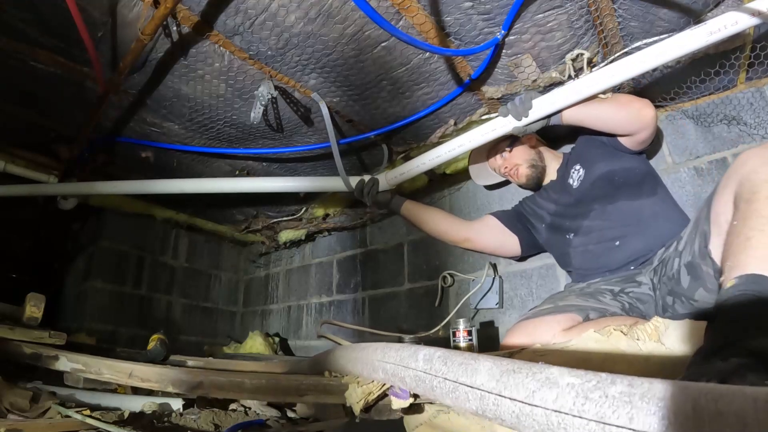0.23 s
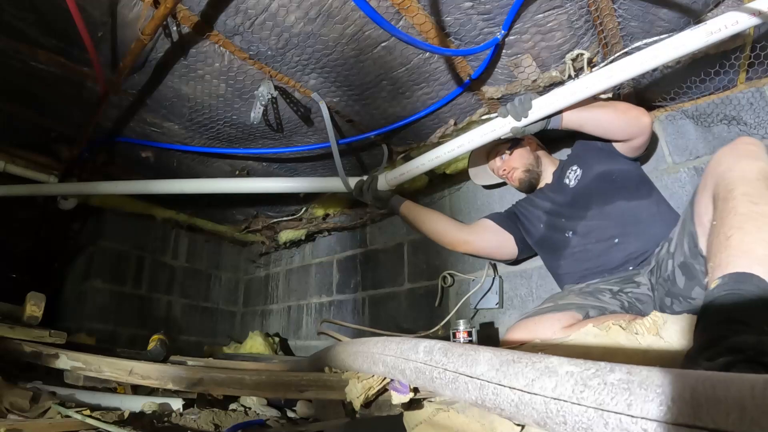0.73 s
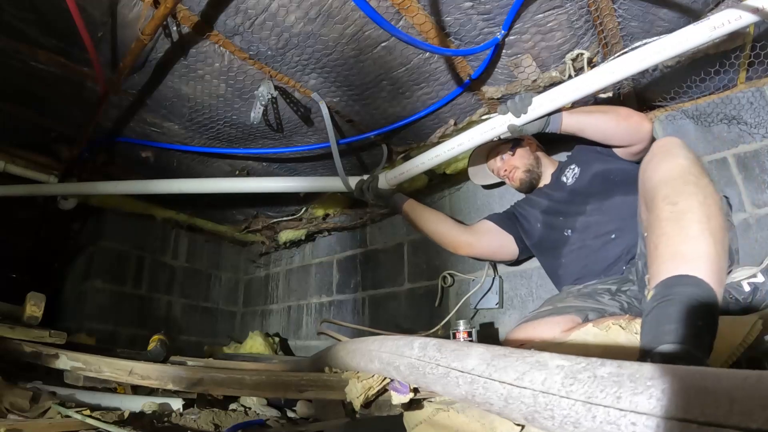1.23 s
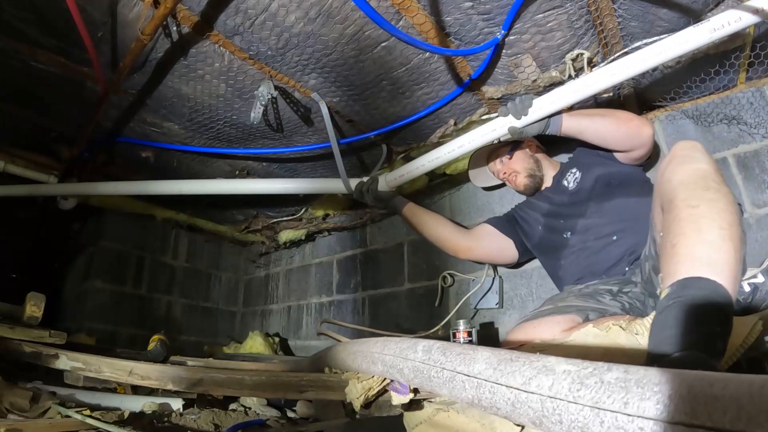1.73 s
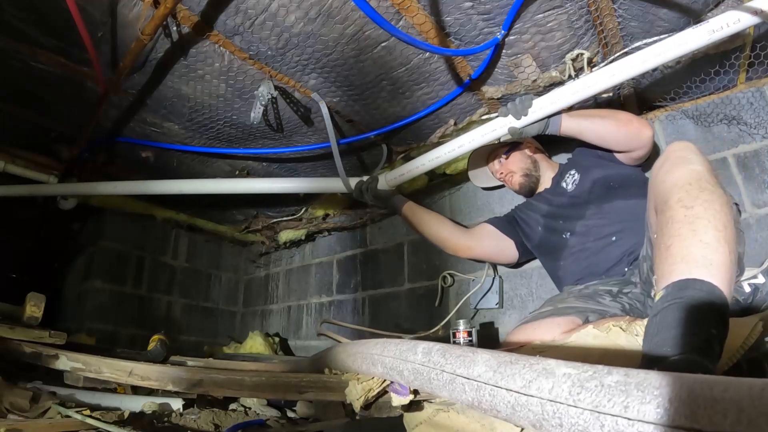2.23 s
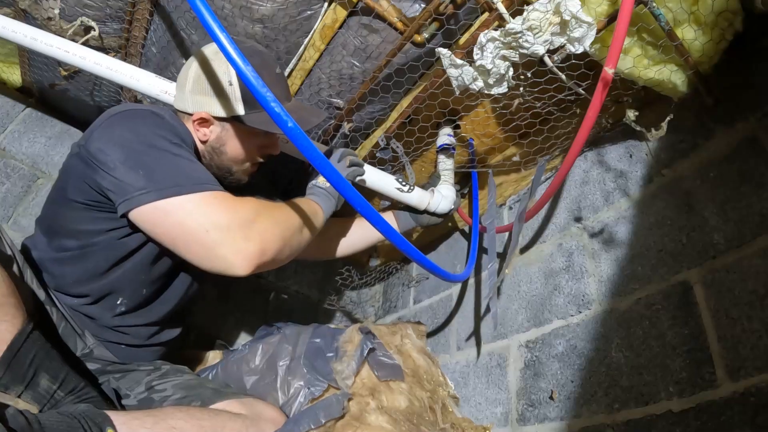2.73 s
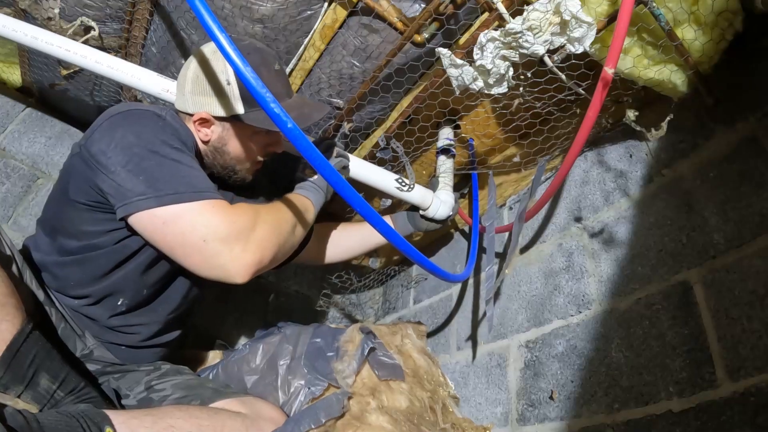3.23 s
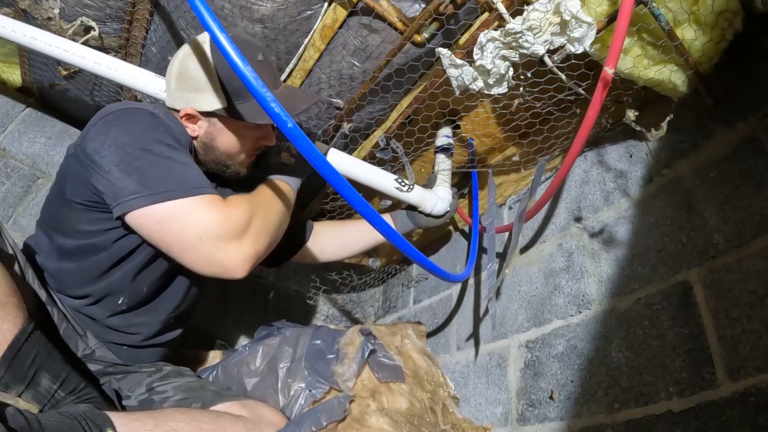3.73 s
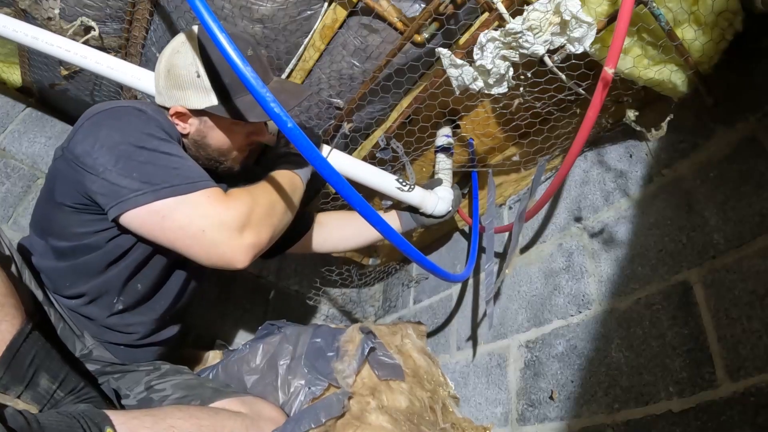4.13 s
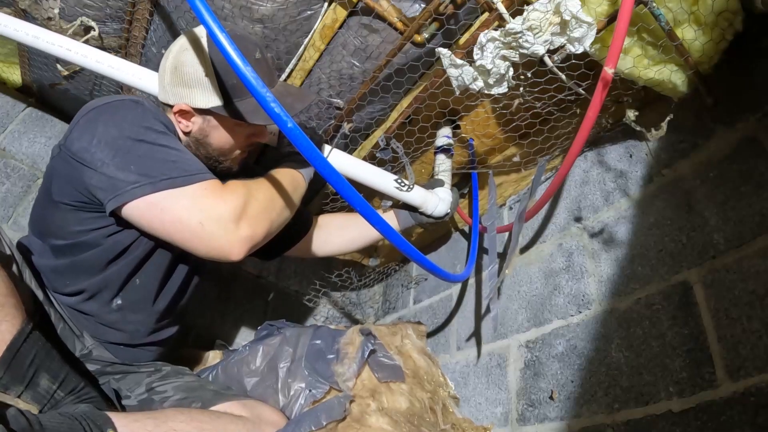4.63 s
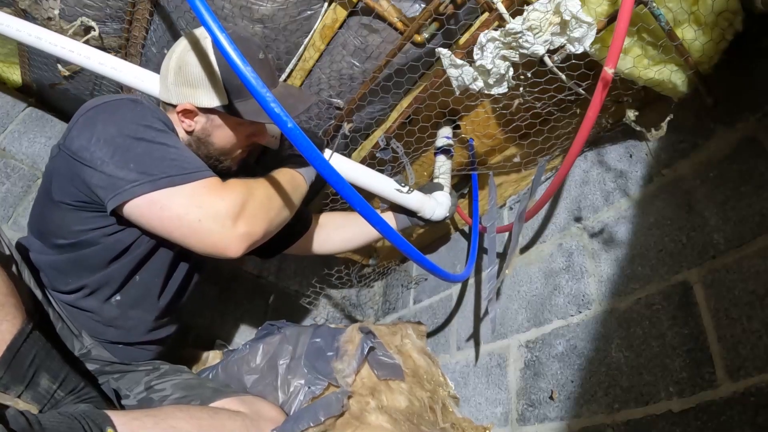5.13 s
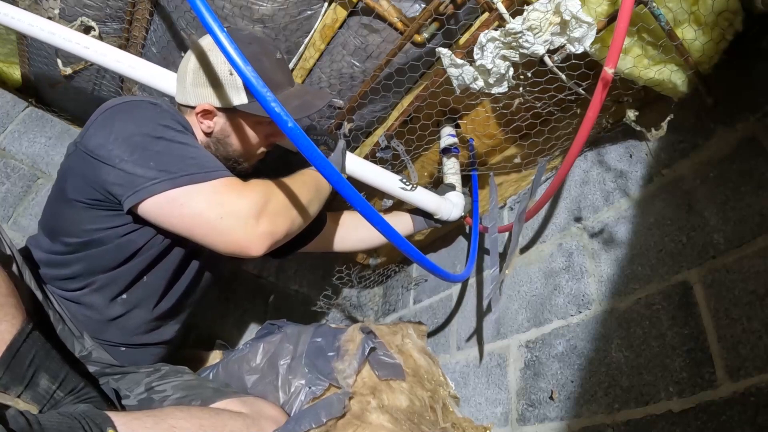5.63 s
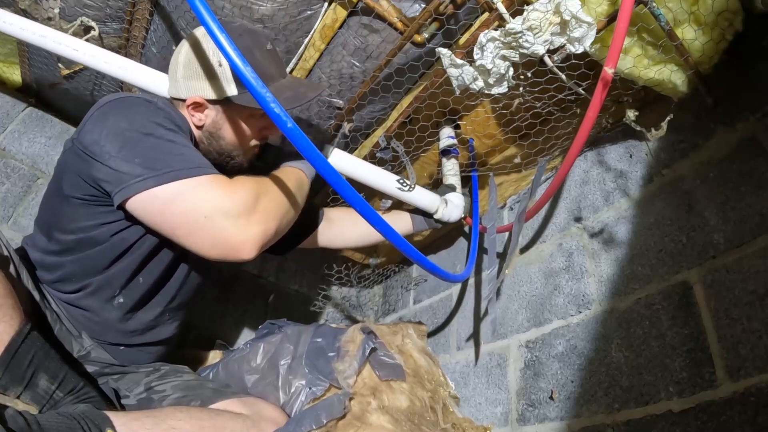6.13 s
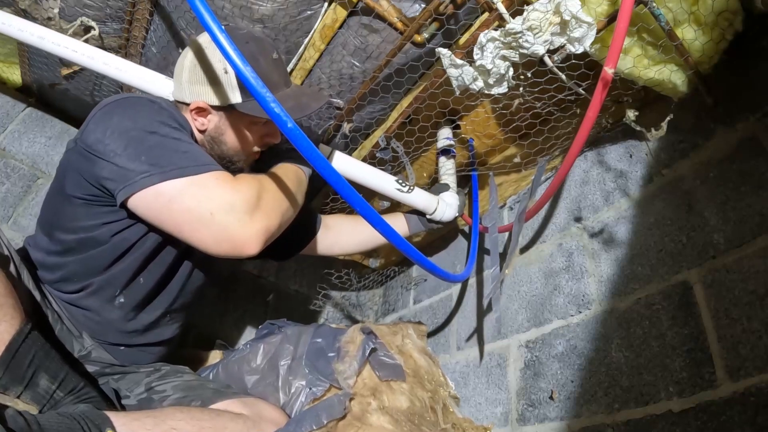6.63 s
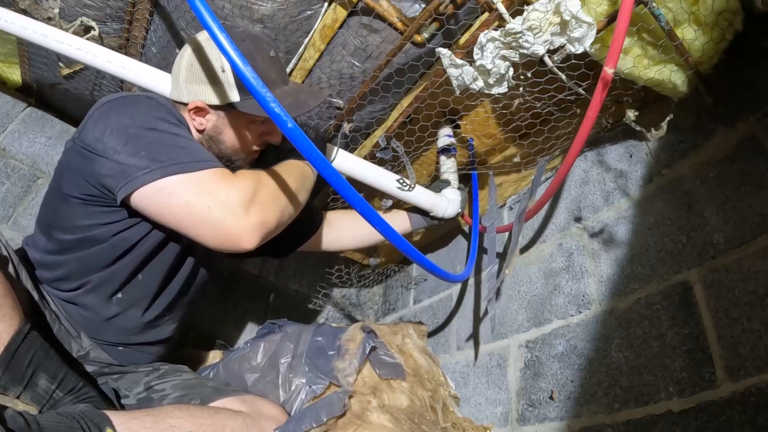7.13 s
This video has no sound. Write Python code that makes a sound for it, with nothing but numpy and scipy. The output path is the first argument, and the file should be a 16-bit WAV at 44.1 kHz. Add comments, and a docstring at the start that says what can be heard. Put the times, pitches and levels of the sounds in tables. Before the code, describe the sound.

Close stereo sound in a low block-walled crawl space: faint low hum and hiss, a long plastic pipe swaying with dull rumble. Gritty rustling and crisp ticks peak after one second, hard clacks follow near two, then lighter scuffs and stuttering slips in the socket. Two heavy hollow bump moments come at about 5.6 and 6.3 seconds, then a thump and a few rattly slips.

```python
"""Plastic drain pipe wrestled into its fitting

In a low crawl space, close to two microphones, the long pipe sways and booms: coloured random grains.
Plastic and sleeves scuff over grit and wire as swelling, patchy noise; narrow noise bands squeak.
The joint slips in short stutters through ringing socket modes; bumps are dying sines, and ticks and
snaps are clicks with short noise tails. A faint hum and hiss lie under it all.
"""
import sys
import numpy as np
from scipy import signal
from scipy.fft import rfft, irfft, next_fast_len
from scipy.io import wavfile
from scipy.ndimage import uniform_filter1d

SR = 44100
rng = np.random.default_rng(int(sys.argv[2]) if len(sys.argv) > 2 else 0)


def generate_wav(signal):
    """Clip the signal to [-1, 1] and save it as 16-bit WAV at the path in sys.argv[1]."""
    frames = np.transpose(np.atleast_2d(signal))
    scaled = np.clip(frames, -1, 1) * 32767
    pcm = np.round(scaled).astype(np.int16)
    wavfile.write(sys.argv[1], SR, pcm)


N = 325458  # length in samples

# strokes of hands and pipe: start_s, length_s, swell_share (0-1 of the length),
# plastic scrape_db, gritty rustle_db, jolt_db of the pipe wall
STROKES = [(0, 0.52, 0.04, -62, -57, -64), (.24, 0.17, 0.55, -50, -42.5, -57),
           (0.208, 0.28, 0.8, -65, -53.5, -44), (.78, 0.15, 0.99, -57, -49, -44),
           (.925, 0.28, 0.08, -58, -39, -57), (1.029, 0.091, 0.76, -52, -34.5, -41),
           (1.09, 0.14, 0.36, -55, -33.5, -33.5), (1.189, 0.41, 0.23, -58, -46.5, -49),
           (1.57, 0.67, 0.16, -58, -64, -59.5), (1.78, 0.19, 0.57, -52.5, -54.5, -48.5),
           (2.1, 0.27, 0.82, -77, -58, -66), (2.24, 0.2, 0.47, -46, -59, -42),
           (2.3, 0.41, 0, -71, -56, -67), (2.686, 0.35, 0.05, -52, -50.5, -51.5),
           (2.76, 0.29, 0.61, -55, -43.5, -45), (3.01, 0.15, 0.08, -55, -47, -44),
           (3.08, 0.39, 0.18, -59, -57.5, -55), (3.407, 0.38, 0.5, -58.5, -55.5, -56),
           (3.698, 0.32, 0.73, -56, -51, -56), (3.977, 0.17, 0.09, -50.5, -48.5, -50),
           (3.979, 0.63, 0.32, -55.5, -53.5, -48.5), (4.135, 0.046, .5, -48, -51, -49),
           (4.19, 0.036, 0.5, -50, -49, -52), (4.295, 0.11, .2, -53.5, -54, -42),
           (4.405, 0.62, 0.33, -69, -63, -54), (4.81, 0.17, 0.77, -59, -51, -67),
           (4.949, .12, 0.5, -63, -71, -42), (5.095, 0.74, 0.06, -56, -55.5, -50.5),
           (5.296, 0.32, 0.87, -59, -53.5, -44.5), (5.585, 0.094, 0.21, -45, -37.5, -32),
           (5.601, 0.37, 0.06, -50, -48.5, -41), (5.884, 0.32, 0.27, -68, -52, -58),
           (6.095, 0.29, 0.32, -53.5, -62.5, -44.5), (6.258, 0.14, 0, -48, -43.5, -34),
           (6.3, 0.1, 0.4, -55, -48, -54), (6.365, 0.055, 0.04, -45, -43.5, -32),
           (6.385, 0.22, 0.28, -49.5, -46.5, -45.5), (6.99, 0.5, 0.3, -56, -64.5, -46),
           (7.2, 0.14, 0.46, -59.5, -54, -49), (7.3, 0.16, 0.51, -53, -54.5, -39.5)]
# resting level between strokes: scrape_db, rustle_db, jolt_db
REST_LEVELS = [-70.5, -67.5, -63]


def gain_of(db):
    """Turns decibels into amplitude."""
    return 10 ** (np.asarray(db) / 20)


def evened(x):
    """Scales a sound to rms 1."""
    return x / np.sqrt(np.mean(x ** 2) + 1e-20)


def read(points, hz):
    """Reads a curve between its points on a log-frequency axis."""
    f, value = np.transpose(points)
    return np.interp(np.log(hz + 1), np.log(f + 1), value)


def levels(rows):
    """Turns the dB columns of a timed table into one gain per sample."""
    s, *columns = np.transpose(rows)
    time = np.arange(N) / SR
    return [gain_of(np.interp(time, s, column)) for column in columns]


def arches(rows, rest_db):
    """Each movement swells and fades in a rounded arch; overlapping ones add their power."""
    ends_db, roundness = -19, 1.57  # level at the ends against the top; exponent of the arch
    t = np.arange(0, N, 32) / SR
    power = gain_of(rest_db)[:, None] ** 2 * np.ones(len(t))
    for start, length, swell, *top_db in rows:
        u = (t - start) / length
        swell = np.clip(swell, .03, .97)
        away = np.where(u < swell, (swell - u) / swell, (u - swell) / (1 - swell))  # 0 at the top
        arch_db = np.array(top_db)[:, None] + ends_db * away ** roundness
        power = power + gain_of(arch_db) ** 2
    return [np.interp(np.arange(N) / SR, t, np.sqrt(p)) for p in power]


def add(mix, s, sound):
    """Mixes a sound in at a time in seconds."""
    part = mix[..., round(s * SR):][..., :sound.shape[-1]]
    part += sound[..., :part.shape[-1]]


def ring(hz, t60, rise):
    """A resonance: an exponentially dying sine with a soft start, t60 and rise in seconds."""
    t = np.arange(SR // 2) / SR
    return gain_of(-60 * t / t60) * (1 - np.exp(-t / rise)) * np.sin(2 * np.pi * hz * t)


def rubbed(colour, per_s, spread_db, smooth):
    """Friction: random grains of uneven size over smooth noise, coloured, partly unlike left and right."""
    # likeness of the two sides: pitch_hz, likeness (0-1)
    likeness = [(40, .9995), (250, 0.99), (500, 0.9), (1000, 0.88), (2000, 0.8), (4000, 0.8), (8000, 0.75),
                (13000, 0.15)]
    size = next_fast_len(N)
    grain_size = gain_of(spread_db * np.minimum(rng.exponential(1, (2, size)), 3))
    grains = grain_size * (rng.random((2, size)) < per_s / SR)
    # each grain is a short burst
    grains = signal.lfilter([1], [1, -.9], grains) * rng.standard_normal((2, size))
    left, other = rfft(evened(grains) + smooth * rng.standard_normal((2, size)))
    hz = np.fft.rfftfreq(size, 1 / SR)
    same = np.clip(read(likeness, hz), 0, 1)
    right = same * left + np.sqrt(1 - same ** 2) * other
    coloured = np.array([left, right]) * gain_of(read(colour, hz))
    return evened(irfft(coloured, size)[:, :N])


def patchy(x, depth_db):
    """Contact wanders over the surface, so short patches of pitch swell and fade."""
    z = signal.stft(x, nperseg=256)[2]
    patches = rng.standard_normal(z.shape[1:])
    patches = uniform_filter1d(patches, size=4, axis=0)  # across pitch
    patches = uniform_filter1d(patches, size=7, axis=1)  # across time
    wandering = z * gain_of(depth_db * evened(patches))
    return evened(signal.istft(wandering, nperseg=256)[1][:, :N])


def socket(x):
    """Passes a drive through the ringing modes of the socket."""
    # modes: pitch_hz, relative level_db, t60_s
    socket_modes = [(603, 0, .04), (1060, -4, .022), (1250, 1, .026), (2460, -4, .011), (3470, -5, .008),
                    (3850, -6, .008), (4600, -7, .007), (5270, -8, .009), (6000, -10, .006),
                    (7410, -11, .005)]
    modes = sum(gain_of(db) * ring(hz, t60, 1.5 / hz) for hz, db, t60 in socket_modes)
    return signal.oaconvolve(x, modes[None] / np.linalg.norm(modes), axes=1)[:, :N]


def background():
    """Steady hiss and rumble from coloured noise, with a constant low sine hum."""
    # floor colour: pitch_hz, relative level_db per Hz
    floor_colour = [(24, -31), (40, 3.5), (62, -5), (134, 0), (260, -27), (357, -21.5), (543, -60),
                    (729, -39), (1350, -35), (3190, -106), (6840, -46), (12100, -54), (14300, -82)]
    floor_db, hum_hz, hum_db = -44.5, 62, -50.5  # both levels are rms
    hum = np.sqrt(2) * gain_of(hum_db) * np.sin(2 * np.pi * hum_hz * np.arange(N) / SR)
    return gain_of(floor_db) * rubbed(floor_colour, 1800, 4.8, 1.85) + hum


def crawl_space(x, t60):
    """Close block walls return a short tail of sparse taps, different at each microphone."""
    taps = np.zeros((2, SR // 4))
    # one tap in every 20 samples, at a random place
    at = np.arange(120, SR // 4 - 20, 20) + rng.integers(0, 20, (2, (SR // 4 - 121) // 20))
    np.put_along_axis(taps, at, rng.choice([-1., 1.], at.shape), 1)
    taps *= gain_of(-60 * np.arange(SR // 4) / SR / t60)
    return signal.fftconvolve(x, taps / np.linalg.norm(taps[0]), axes=1)[:, :N]


def shaking():
    """Every push jolts the long pipe and the timbers it rests on, as four bands of grainy noise."""
    # slow strain on pipe and joists: time_s, sway_db, boom_db, hollow knock_db
    strain = [(0.0, -48.5, -65, -57.5), (0.2, -37.5, -45.5, -53), (0.8, -40, -61, -69),
              (1.07, -30, -37.5, -39.5), (1.64, -33, -49, -57.5), (2.28, -31.5, -37, -81),
              (2.53, -40, -64, -78), (2.77, -27.5, -62, -79), (2.9, -32.5, -44.5, -52.5),
              (3.76, -33.5, -54, -61.5), (4.25, -32.5, -34.5, -51), (4.83, -29.5, -45, -56.5),
              (5.55, -28.5, -29, -44.5), (5.65, -23, -27, -35.5), (5.82, -24.5, -37.5, -52.5),
              (6.13, -32.5, -36.5, -47), (6.37, -17.5, -24.5, -51), (6.62, -43, -52, -55),
              (6.9, -28, -38, -53.5), (7.38, -38, -41, -44.5)]
    # heaves of the whole pipe against its supports:
    # start_s, length_s, swell_share (0-1), boom_db, hollow knock_db
    heaves = [(.24, 0.26, 0.33, -39.5, -38.5), (.83, 0.2, 0.5, -29, -52), (1.14, 0.11, 0.53, -22.5, -45),
              (1.75, 0.11, 0.6, -35, -47), (2.14, 0.12, 0.96, -31.5, -54), (2.7, .16, 0.58, -32.5, -50),
              (2.98, 0.23, 0.45, -57, -47), (3.48, 0.22, 0.3, -37.5, -54), (4.13, 0.26, 0.45, -52, -36),
              (4.3, 0.3, 0.2, -27.5, -45), (4.93, 0.14, 0.4, -43, -43.5), (5.42, 0.11, 0.8, -29, -38),
              (6.43, 0.18, 0.6, -30.5, -44.5), (6.72, 0.16, 0.27, -45, -43.5)]
    # colour of each part of the shaking: pitch_hz, relative level_db per Hz
    sway_colour = [(10, -16), (19, -4), (26, 21.5), (35, 11.5), (50, 13), (62, 14.5), (80, 0), (110, -54)]
    boom_colour = [(60, -66), (90, 2), (125, 5), (150, -1), (190, -2), (230, -15), (300, -91)]
    hollow_colour = [(170, -11), (240, 10), (300, 7), (380, 3), (480, -55)]
    wall_colour = [(300, 0.5), (420, 4.5), (520, -5), (750, -14), (1000, -82)]
    jolt_boom_db, jolt_hollow_db = 7, -5  # how a jolt spreads to the lower parts
    sway, boom, hollow = levels(strain)
    wall = arches(STROKES, REST_LEVELS)[2]
    heave_boom, heave_hollow = arches(heaves, [-99, -99])
    boom = np.sqrt(boom ** 2 + heave_boom ** 2 + (gain_of(jolt_boom_db) * wall) ** 2)
    hollow = np.sqrt(hollow ** 2 + heave_hollow ** 2 + (gain_of(jolt_hollow_db) * wall) ** 2)
    return (sway * rubbed(sway_colour, 30, 3.3, 1.72)
            + boom * rubbed(boom_colour, 60, 3.0, 1.3)
            + hollow * rubbed(hollow_colour, 120, 1.8, 1.0)
            + wall * rubbed(wall_colour, 300, 1.6, 1.67))


def bumps():
    """A soft thump with the pipe wall ringing above it; hard shoves also leave the pipe swinging."""
    # low bumps: start_s, nominal level_db, thump pitch_hz, pipe ring_db against the bump
    thumps = [(0.113, -31, 190, -31), (0.524, -29.5, 99, -21), (0.926, -19, 71, -28), (1.041, -19, 97, -26),
              (1.132, -35, 98, -25), (1.587, -37.5, 91, -10), (1.801, -40, 72, -35),
              (2.022, -23.5, 144, -44), (2.315, -23.5, 83, -21), (2.924, -20.5, 150.6, -18),
              (3.936, -25, 130, -12.5), (4.085, -17, 133, -18.5), (4.199, -34, 111, 6),
              (5.265, -36, 148, -1), (5.585, -6.5, 104, -22.5), (6.263, -3.5, 146.5, -8.5),
              (6.319, -9, 140, -12), (6.37, -7.5, 138, -8), (6.469, -18.5, 128, -11.5),
              (6.756, -20, 137, -6.5), (6.977, -12, 86, -22.5), (7.299, -16.5, 119, -27)]
    # ringing of the pipe wall: pitch_hz, relative level_db, t60_s
    pipe_modes = [(283.2, 4, 0.19), (308.6, 6.5, 0.12), (383, -5, 0.091), (474, -16, 0.074)]
    # the whole pipe swings: start_s, level_db before the slow rise, pitch_hz, t60_s
    swings = [(5.609, 0, 33.76, 0.5), (6.274, 9, 39.4, 0.19), (6.362, -7, 33.3, 0.46),
              (6.498, -1, 37.3, 0.28), (6.777, 4.5, 33.8, 0.13), (6.859, 2.5, 37.6, 0.11)]
    out = np.zeros(N)
    pipe = sum(gain_of(db) * ring(hz, t60, 0.0058) for hz, db, t60 in pipe_modes)
    for s, db, hz, ring_db in thumps:
        thump = 2.22 * ring(hz, 0.084, 0.0056)
        add(out, s, gain_of(db) * (thump + 0.84 * gain_of(ring_db) * pipe))
    for s, db, hz, t60 in swings:
        add(out, s, gain_of(db) * ring(hz, t60, 0.11))
    return out


def squeaks():
    """Rubbing catches one narrow resonance: band noise that swells and fades in a single arch."""
    # squeaks and swishes: start_s, length_s, pitch_hz, width_hz, rms level_db before the arch
    caught = [(0.933, 0.099, 3240, 500, -50), (1.296, 0.075, 3740, 650, -45), (1.1, 0.095, 6100, 200, -68),
              (3.991, 0.026, 3830, 140, -43.5), (1.1, .085, 520, 310, -38.5),
              (1.68, 0.012, 1370, 150, -44.5), (1.684, 0.072, 7500, 400, -67),
              (3.991, 0.018, 5500, 300, -42.5), (4.87, 0.092, 1100, 110, -55.5),
              (4.1, .11, 2300, 410, -53.5), (4.283, 0.086, 5100, 120, -62), (5.606, 0.054, 1175, 44, -37.5),
              (5.598, 0.024, 2200, 80, -38.5), (5.594, 0.031, 3830, 370, -37),
              (5.618, 0.067, 7900, 80, -66), (6.276, 0.1, 5050, 300, -55), (6.419, 0.052, 3600, 150, -45),
              (6.42, 0.08, 5600, 200, -56), (6.447, 0.052, 3280, 80, -51), (6.476, 0.1, 6500, 120, -60),
              (6.49, 0.14, 5980, 120.6, -64)]
    out = np.zeros((1, N))
    noises = rng.standard_normal((len(caught), SR // 5))
    for (s, length, hz, width_hz, db), noise in zip(caught, noises):
        u = np.linspace(0, 1, round(length * SR))
        band = [hz - width_hz / 2, hz + width_hz / 2]
        tone = signal.lfilter(*signal.butter(1, band, "band", fs=SR), noise)
        add(out, s, gain_of(db) * evened(tone[-len(u):]) * np.sin(np.pi * u ** 0.85))
    return out


def slips():
    """Each slip of the pipe is a short burst of chatter, heard bare and ringing in the socket."""
    # slips in the socket: start_s, drive level_db
    slip_times = [(3.852, -48), (3.902, -45.5), (3.933, -45), (4.243, -37.5), (4.48, -36), (4.968, -31),
                  (5.114, -40), (5.156, -44), (5.182, -39), (5.214, -39), (5.265, -41), (5.306, -43.5),
                  (5.329, -47.5), (5.488, -42.5), (5.96, -45), (7.031, -36), (7.078, -35), (7.128, -37.5),
                  (7.187, -46), (7.222, -44.5), (7.257, -39.5), (7.318, -36.5)]
    rise_s, t60_s, tail_t60_s = .001, 0.026, .11
    drive, t = np.zeros((1, N)), np.arange(2000) / SR
    decay = gain_of(-60 * t / t60_s) + 0.27 * gain_of(-60 * t / tail_t60_s)
    shape = (1 - np.exp(-t / rise_s)) * decay
    click = 2.5 * np.exp(-((t - .0005) / .00005) ** 2)
    for (s, db), chatter in zip(slip_times, rng.standard_normal((len(slip_times), len(t)))):
        add(drive, s, gain_of(db) * (chatter * shape + click))
    bare = signal.lfilter(*signal.butter(2, [450, 8000], "band", fs=SR), drive)
    return gain_of(-3.0) * socket(drive) + gain_of(-5.5) * bare


def snaps():
    """A brittle break of grit or wire: one click and a few milliseconds of splinters, with no ring."""
    # dry snaps: start_s, peak level_db, low_hz, high_hz
    breaks = [(1.106, -27, 1200, 3000), (1.116, -26, 400, 900), (1.127, -27, 450, 1400),
              (1.152, -30, 2500, 8000), (1.178, -28, 1300, 7000), (1.794, -36, 1200, 3500),
              (1.71, -49, 900, 4000), (1.849, -30, 900, 9000), (1.892, -26.5, 1800, 5100),
              (1.94, -45, 5000, 7500), (2.302, -37, 1000, 9000), (2.362, -38, 700, 5000),
              (2.396, -37, 1500, 7000), (2.408, -38, 3000, 10100), (3.968, -48, 4000, 12000),
              (4.062, -47, 3500, 9000), (4.095, -38, 3000, 8500), (4.111, -37, 3000, 8000),
              (4.124, -35, 3000, 10000), (4.278, -45, 3000, 11000), (4.455, -48, 5000, 12000),
              (5.283, -43, 900, 1700), (5.434, -29, 500, 2580), (7.174, -44, 4500, 7500)]
    out, t = np.zeros((1, N)), np.arange(400) / SR
    noises = rng.standard_normal((len(breaks), len(t)))
    for (s, db, low_hz, high_hz), splinters in zip(breaks, noises):
        burst = splinters * gain_of(-60 * t / 0.0064) + 3.6 * (t == 0)
        contact = signal.lfilter([1], [1, -.75], burst)
        band = signal.butter(3, [low_hz, high_hz], "band", fs=SR, output="sos")
        snap = signal.sosfilt(band, contact)
        add(out, s, gain_of(db) * snap / abs(snap).max())
    return out


def ticks():
    """A hard edge makes a sharp contact with a rough tail: a body near its own pitch and a bright crack."""
    # hard ticks: start_s, nominal level_db, pitch_hz, bright crack_db against the tick
    edges = [(0.045, -47, 1520, 0), (0.124, -36, 1330, -6), (0.145, -35.5, 1150, -22),
             (0.719, -39.5, 1880, -20), (0.821, -39, 1970, -14), (0.861, -38, 1420, -21),
             (0.886, -40, 5000, -3), (0.934, -26.5, 3570, -4.5), (1.127, -20, 820, -25),
             (1.143, -19, 2200, -3), (1.177, -31, 915, -25), (1.241, -26, 2320, -14),
             (1.285, -26.5, 1720, -17), (1.54, -43, 2100, -1.5), (1.617, -40.5, 1130, -30),
             (1.682, -49, 1440, -11), (1.736, -33.5, 1120, -27), (1.788, -28.5, 1510, -24),
             (1.863, -27, 1310, -26), (1.915, -20, 1220, -30), (1.94, -39, 940, -13),
             (2.124, -31, 1620, -31), (2.295, -33, 1050, -14), (2.318, -14.5, 1050, -33),
             (2.324, -17.5, 1380, -34), (2.34, -24, 1050, -25), (2.583, -41, 7720, 2),
             (2.685, -38.5, 3630, -10), (2.751, -34, 2450, -6), (2.803, -30.5, 3870, -11),
             (2.885, -45.5, 1360, 15), (2.916, -33.5, 2420, -13), (2.956, -31, 7700, 0),
             (3.018, -26.5, 4640, -30), (3.632, -29, 4210, -3), (3.903, -31, 3530, -8),
             (3.994, -32, 3940, 2), (4.084, -30, 1980, -28), (4.204, -45, 1700, 2), (5.437, -33, 1510, -21),
             (5.592, -23.5, 2490, -17), (6.267, -33.5, 806, 9), (6.273, -44, 810, -4),
             (6.37, -26, 840, -28), (6.441, -27, 4920, -15), (6.971, -35, 1020, -25)]
    out, t = np.zeros((1, N)), np.arange(SR // 10) / SR
    noises = rng.standard_normal((len(edges), 2, len(t)))
    crack_band = signal.butter(2, [2800, 11000], "band", fs=SR)
    for (s, db, hz, crack_db), rough in zip(edges, noises):
        contact = rough * gain_of(-60 * t / np.array([[.02], [.025]]))  # t60 of body and crack in s
        contact[:, 0] += 4.5  # the sharp first contact
        body_band = signal.butter(2, [0.69 * hz, min(1.6 * hz, 14000)], "band", fs=SR)
        body = signal.lfilter(*body_band, contact[0])
        crack = signal.lfilter(*crack_band, contact[1])
        body = 0.55 * body / abs(body).max()
        crack = gain_of(crack_db) * crack / abs(crack).max()
        add(out, s, gain_of(db) * 0.36 * ring(hz, 0.021, 0.000051))
        add(out, s, gain_of(db) * (body + crack))
    return out


def rubbing():
    """Plastic scrapes dully, partly through the socket; cloth, grit and wire rustle brightly."""
    # colour of scrape and rustle: pitch_hz, relative level_db per Hz
    scrape_colour = [(500, -22), (800, -18), (1050, 8.5), (1500, 9.5), (2300, 4.5), (3200, -29),
                     (5000, -107)]
    rustle_colour = [(1500, 6), (2800, 4.5), (4000, 2), (7000, 3.5), (8200, -8), (12500, -7.5),
                     (14500, 8.5), (16000, -50)]
    # power share of the scrape that comes from inside the socket: time_s, share (0-1)
    seated_share = [(0.3, 0.4), (1.4, 0.5), (1.6, 0.15), (2.45, 0.1), (2.7, 0.77), (3.8, 0.87), (3.9, 0.9),
                    (4.7, 0.1), (4.9, 0.2), (5.4, 0.4), (5.7, 0.36), (6.4, 0.08), (6.999, 0.5), (7.38, 0.3)]
    dull_until_s, dull_above_hz, treble_loss = 2.68, 4800, 0.5  # the rustle is duller at first
    scrape, rustle, _ = arches(STROKES, REST_LEVELS)
    seated = np.clip(np.interp(np.arange(N) / SR, *np.transpose(seated_share)), 0, 1)
    inside = socket(rubbed([(800, -11.5), (1100, -14), (8000, 2.5)], 400, 8.0, 1.0))
    outside = rubbed(scrape_colour, 300, 3.2, 1.17)
    plastic = np.sqrt(1 - seated) * outside + np.sqrt(seated) * evened(inside)
    grit = patchy(rubbed(rustle_colour, 1500, 3.7, 0.7), 2.2)
    treble = signal.filtfilt(*signal.butter(2, dull_above_hz, "high", fs=SR), grit)
    grit = grit - treble_loss * (np.arange(N) < dull_until_s * SR) * treble
    return scrape * patchy(plastic, 2.7) + rustle * grit


def scene():
    """Sums all sources; the hard sounds also ring on in the crawl space."""
    hits = ticks() + slips() + squeaks()
    brittle = snaps()
    echoes = gain_of(-7.0) * crawl_space(hits + gain_of(-9.0) * brittle, 0.08)
    return background() + shaking() + bumps() + hits + brittle + echoes + rubbing()


def record(dry):
    """Two close microphone ports with their own balance, delay and treble loss; then the band limit."""
    # treble response of both ports: pitch_hz, level_db
    port_response = [(11000, -0.5), (13000, -7), (14400, -31), (15200, -18)]
    # left level against right: pitch_hz, level_db
    balance = [(250, 0), (500, -2), (1000, -3), (2000, -0.5), (4000, -1), (8000, 1.5), (13000, 3)]
    # how late the left port is: pitch_hz, delay in samples
    left_delay = [(500, 2.4), (3000, 1.3), (8000, 0.088)]
    edge_hz = 15400
    hz = np.fft.rfftfreq(N, 1 / SR)
    ports = gain_of(read(port_response, hz) + np.outer([.5, -.5], read(balance, hz))) + 0j
    ports[0] *= np.exp(-2j * np.pi * hz / SR * read(left_delay, hz))
    heard = irfft(rfft(dry) * ports, N)
    low_pass = signal.firwin(511, edge_hz, window=("kaiser", 9), fs=SR)
    return signal.oaconvolve(heard, low_pass[None], "same")


dry = scene()
out = record(dry)
generate_wav(out)
```